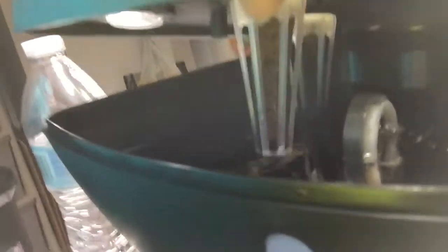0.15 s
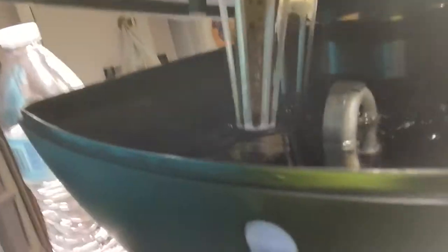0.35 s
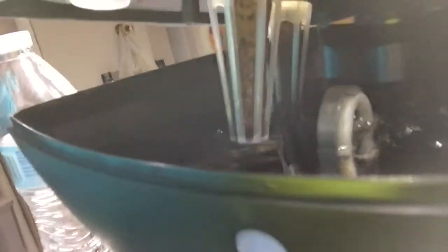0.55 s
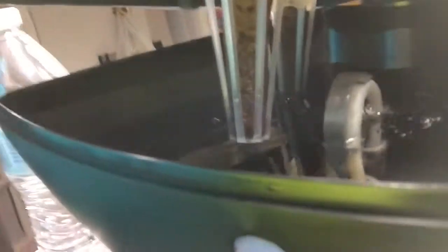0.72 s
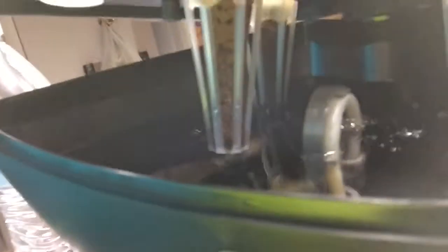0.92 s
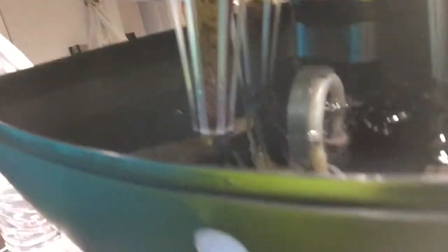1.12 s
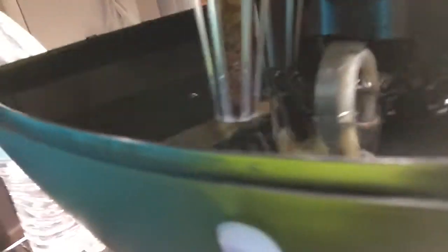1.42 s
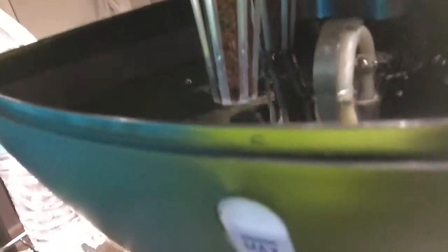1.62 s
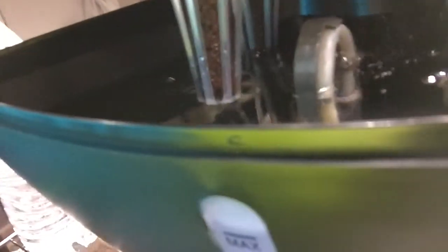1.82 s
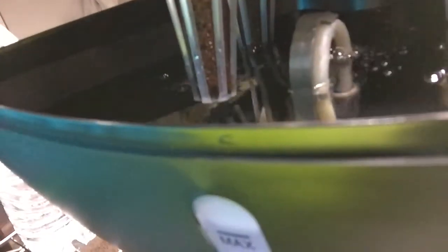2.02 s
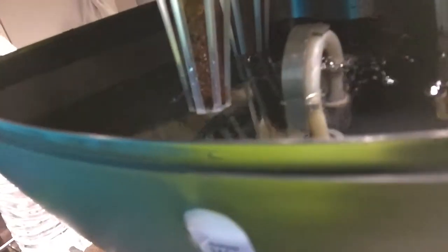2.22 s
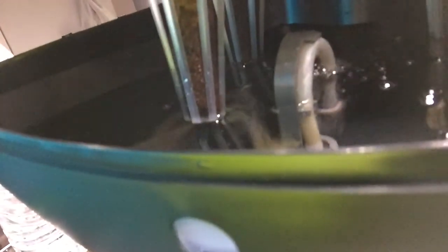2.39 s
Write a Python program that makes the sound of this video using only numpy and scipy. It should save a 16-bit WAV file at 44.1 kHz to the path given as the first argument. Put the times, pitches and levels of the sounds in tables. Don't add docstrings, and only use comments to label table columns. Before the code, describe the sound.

Water bubbling in a small plastic reservoir indoors: a quiet, low, unsteady pump drone with muffled glugs runs throughout, under thin froth and tiny high pops. At about 0.2 s a plastic lid snaps loudly, bouncing at 0.27, 0.31 and 0.37 s, its short room tail cut off by about 0.45 s. Then scattered crisp pops, brighter ones near 0.57 and 1.6 s, continue until 2.5 s. Close phone microphone, noise-suppressed.

```python
import sys
import numpy as np
from scipy import signal
from scipy.fft import rfft, irfft, next_fast_len
from scipy.io import wavfile
from scipy.ndimage import uniform_filter1d, map_coordinates

SR = 44100
rng = np.random.default_rng(int(sys.argv[2]) if len(sys.argv) > 2 else 0)


def to_wav(s):
    ch = np.atleast_2d(s).T
    pcm = np.round(np.clip(ch, -1, 1) * 32767)
    wavfile.write(sys.argv[1], SR, pcm.astype(np.int16))


def nominal_scale(level):
    x = np.asarray(level, float) / 20
    return 10 ** x


N = 112454

# freq_hz, density_db_per_hz
DRONE_SPECTRUM = [(24, -56.5), (50, -34), (140, -3.5), (172, -8.5), (207, -7), (483, -8), (600, -19),
                  (1290, -20.5), (1750, -32), (2300, -46), (5000, -120)]
# freq_hz, width_hz, lift_db over the drone
TUB_MODES = [(70.4, 8, 9), (108, 5, 8.5), (145.8, 2.5, 12.5), (162.5, 6, 4), (217, 47, 9), (273, 6, -2.5),
             (582, 5.5, -0.5), (627, 18, 11.5)]
# freq_hz, level_db rms
PUMP_TONES = [(479.5, -54), (539, -59)]
# time_s, level_db rms
HUM_SWELL = [(0.501, -42.5), (0.849, -61), (1.021, -50), (1.25, -51), (1.47, -46.5), (1.76, -39.5),
             (2.05, -52), (2.251, -64), (2.37, -38), (2.461, -58.5), (2.55, -33.5)]
# time_s, level_db
FROTH_LEVEL = [(0.0, -64.5), (0.25, -68), (0.42, -73), (0.62, -82.5), (0.74, -72.5), (0.821, -66),
               (0.95, -68), (1.05, -105), (1.321, -75), (1.52, -69), (1.9, -85), (2.14, -86), (2.27, -88),
               (2.55, -97)]
# freq_hz, density_db_per_hz
SPRAY_SPECTRUM = [(5000, -40.5), (6500, -5.5), (7500, -3), (11500, 0.5), (12600, -9.5), (16000, -28)]
# start_s, peak_db, pitch_hz
POPS = [(0.068, -49, 5900), (0.17, -59, 8300), (0.193, -50, 6000), (.4424, -60, 7500), (0.5745, -42, 11200),
        (0.6331, -58, 6230), (0.643, -54, 6500), (.659, -57, 7940), (.728, -54, 7180), (.7444, -58, 11600),
        (0.8035, -53.5, 7080), (0.853, -54, 10960), (0.912, -50, 11100), (1.012, -52, 6970),
        (1.52, -55, 7700), (1.5288, -46.5, 7510), (1.6017, -36.5, 4830), (1.6443, -55, 7500),
        (1.694, -52.5, 7300), (1.705, -53, 8970), (1.716, -57, 9000), (1.7846, -50, 8280),
        (1.91, -53, 7260), (2.036, -44.5, 6100), (2.098, -57, 6230), (2.19, -58.5, 10740),
        (2.324, -48.5, 7370)]
# start_s, peak_db, pitch_hz
MORE_POPS = [(0.639, -64, 14300), (.8, -66, 14350), (.915, -63, 14600), (1.281, -53, 10160),
             (1.332, -58.5, 10050), (1.385, -61.5, 9700), (1.59, -55, 13550), (1.64, -57.5, 10640),
             (1.71, -50.5, 11500), (1.775, -57, 14450), (1.865, -67, 7800), (1.946, -62, 10660),
             (2.055, -57, 10140), (2.04, -48, 7450), (2.305, -57, 7510), (.892, -58.5, 7300)]
# start_s, peak_db, pitch_hz
RINGING_BUBBLES = [(.07, -58, 2053), (.575, -76.5, 3050), (.68, -74, 2140), (.77, -74, 3090),
                   (0.791, -64, 1920), (.82, -77, 3080), (1.278, -68.5, 3940), (1.33, -82, 2850),
                   (1.375, -69.5, 3440), (1.419, -85, 2850), (1.444, -79, 4380), (1.486, -75, 3370),
                   (1.509, -73, 3440), (1.515, -77, 2730), (1.68, -73.5, 3920), (1.82, -81, 3660),
                   (1.87, -81, 2790), (1.99, -84, 3290), (2.02, -71, 2780), (2.119, -80, 3380),
                   (2.26, -70.5, 4920), (2.449, -79, 3400), (2.509, -67, 4980), (2.508, -65, 7450),
                   (1.976, -72, 9050)]
# centre_s, length_s, centre_hz, width_hz, level_db
CLUSTERS = [(0.073, 0.05, 5680, 900, -52.5), (0.164, 0.042, 7950, 1800, -65),
            (0.377, 0.016, 9400, 4000, -66), (0.407, 0.033, 11000, 3000, -74),
            (0.453, 0.015, 8000, 2500, -69), (0.601, 0.064, 8960, 1200, -70),
            (.635, .025, 14500, 2500, -75.5), (0.692, 0.02, 7600, 2500, -66),
            (.72, 0.078, 10800, 2200, -72), (0.718, .07, 14300, 900, -79), (0.778, .012, 10500, 3500, -66),
            (0.794, 0.01, 11100, 2500, -79), (0.836, 0.019, 9500, 4000, -65), (.85, 0.018, 8300, 1200, -61),
            (0.921, 0.035, 8800, 1400, -63.5), (1.108, 0.029, 6880, 900, -67),
            (1.29, 0.014, 7630, 3500, -72), (1.383, 0.096, 6850, 2500, -76.5),
            (1.606, 0.044, 7310, 1200, -74), (1.646, 0.012, 8800, 2500, -66),
            (1.788, 0.043, 8150, 2500, -59), (1.877, 0.024, 7430, 1200, -69),
            (1.985, 0.041, 10430, 2400, -64), (2.02, .03, 6000, 1000, -70), (2.07, .03, 7500, 1000, -66),
            (2.065, .04, 13800, 1800, -77), (2.103, 0.023, 7500, 900, -62.5),
            (2.125, .025, 10800, 2000, -70), (2.144, .025, 7700, 1000, -66),
            (2.215, 0.058, 10700, 2400, -70), (2.22, 0.017, 13200, 2000, -70),
            (2.325, 0.054, 9870, 3500, -68.5), (2.362, 0.018, 7800, 1400, -63),
            (2.405, 0.023, 6450, 700, -63), (2.475, 0.1, 10300, 1700, -77), (2.52, .025, 8500, 500, -69.5),
            (1.45, 0.3, 3080, 1000, -81)]
# start_s, peak_db, centre_hz, spread_octaves
LID_CONTACTS = [(0.209, -27, 1000, 0.5), (.2150, -13.5, 1100, 0.35), (0.2178, -15.5, 1200, .4),
                (.2175, -26.5, 4500, .8), (0.2215, -9.5, 2100, .4), (.2238, -14.5, 1150, 0.4),
                (0.2262, -13.5, 6300, 0.53), (.2266, -19.5, 11200, 1.2), (0.2240, -13.5, 327.4, 0.66),
                (0.2684, -14, 1280, 0.24), (.2690, -27, 3140, 0.46), (0.2715, -20, 445, 0.76),
                (0.2915, -36.5, 2400, 0.5), (0.3108, -18.5, 2180, 0.25), (0.313, -15.5, 790, 1.23),
                (0.3664, -25, 2060, 0.38), (0.367, -22.5, 750, 1)]
# freq_hz, t60_s
LID_MODES = [(215, 0.055), (290, 0.036), (420, 0.021), (600, 0.027), (680, 0.032), (955, 0.029),
             (1090, 0.023), (1280, 0.018), (1620, 0.015), (1950, 0.015), (2350, .008), (2900, 0.011),
             (3700, 0.0049), (6500, 0.0024)]
# freq_hz, t60_s
ROOM_T60 = [(200, .5), (400, 0.79), (1000, 0.82), (3000, 0.27), (8000, 0.26), (15000, .35)]
# freq_hz, level_db
ROOM_COLOUR = [(150, -6.5), (300, 6), (1000, -9.5), (3000, -2), (5500, 5), (7000, -3), (10000, 4),
               (15000, 4.5)]
# freq_hz, close_s
SUPPRESSOR_CLOSE = [(1500, 0.423), (2200, .47), (3800, 0.468), (5500, 0.35), (11000, 0.46), (16000, .345)]
# freq_hz, level_db rms per 500 Hz
HISS_SPECTRUM = [(1500, -92.5), (2500, -101), (4500, -103), (7000, -99), (11500, -99), (12800, -112),
                 (16000, -118)]


def unit(x):
    return x / np.sqrt(np.mean(x ** 2) + 1e-20)


def along(points, hz):
    f, v = np.transpose(points)
    return np.interp(np.log(hz + 1), np.log(f + 1), v)


def filtered(x, response):
    m = next_fast_len(N + SR // 2)
    return irfft(rfft(x, m) * response(np.fft.rfftfreq(m, 1 / SR)), m)[:N]


def wobble(rate_hz):
    knots = rng.standard_normal(int(N / SR * 60) + 4)
    return map_coordinates(knots, [np.arange(N) * min(rate_hz, 60) / SR])


def bell(x, width):
    return np.exp(-.5 * (x / width) ** 2)


def box(x, span):
    return np.exp(-(2 * x / span) ** 4)


def bubbles(start_s, hz, gain, cycles, rise, size):
    t = np.arange(size) / SR
    u = t * hz[:, None] / cycles
    phase = 2 * np.pi * hz[:, None] * t * (1 + rise * np.minimum(u, 2))
    envelope = 2.0 * np.exp(-3 * u) * (1 - np.exp(-4 * u)) ** 2
    wave = gain[:, None] * np.sin(phase) * envelope
    at = (start_s * SR).astype(int)[:, None] + np.arange(size)
    return np.bincount(at.ravel(), wave.ravel(), N + SR)[:N]


def swarm(rate_hz, centre_hz, spread, cycles, scatter_db, size):
    when, pitch, loud = rng.random((600, 3))[:int(rate_hz * N / SR)].T
    hz = centre_hz * np.exp(spread * np.log(pitch / (1 - pitch)) / 1.3)
    gain = nominal_scale(-scatter_db * np.log(loud))
    return unit(bubbles(when * N / SR, np.clip(hz, 60, 15500), gain, cycles, rise=.002, size=size))


def streaked(x):
    z = signal.stft(x, nperseg=1024, noverlap=768)[2]
    field = unit(uniform_filter1d(rng.standard_normal(z.shape), size=11, axis=1))
    return signal.istft(z * nominal_scale(9 * field - 7), nperseg=1024, noverlap=768)[1][:N]


def drone():
    edge_hz, edge_db = 1800, -14

    def response(f):
        tub = np.sqrt(1 + sum(nominal_scale(db) ** 2 / (1 + (2 * (f - c) / w) ** 2) for c, w, db in TUB_MODES))
        dark = nominal_scale(edge_db / (1 + (edge_hz / np.maximum(f, 20)) ** 40))
        return nominal_scale(along(DRONE_SPECTRUM, f)) * tub * dark

    noise = unit(filtered(rng.standard_normal(N), response))
    return noise * nominal_scale(0.16 * wobble(1.5) + 0.57 * wobble(30))


def glugs():
    large = swarm(90, 248, 0.52, cycles=3, scatter_db=5.5, size=2000)
    return filtered(large, lambda f: 1 / (1 + (f / 1100) ** 6) / (1 + (90 / (f + 1)) ** 4))


def pump_tones():
    t = np.arange(N) / SR
    drift_rad, hum_hz = .3, 137.2
    tones = np.zeros(N)
    for hz, db in PUMP_TONES:
        level = nominal_scale(db + 0.5 + 0.83 * wobble(5.5))
        tones += level * np.sin(2 * np.pi * hz * t + drift_rad * wobble(5))
    when_s, db = np.transpose(HUM_SWELL)
    hum = np.sin(2 * np.pi * hum_hz * t + drift_rad * wobble(3.6))
    return tones + nominal_scale(np.interp(t, when_s, db) - 0.5) * hum


def pump():
    return nominal_scale(-43.5) * (drone() + nominal_scale(-17) * glugs()) + pump_tones()


def froth():
    f, _, z = signal.stft(rng.standard_normal(N), SR, nperseg=256)
    patches = uniform_filter1d(rng.standard_normal(z.shape), size=16, axis=0)
    patches = unit(uniform_filter1d(patches, size=3, axis=1))
    tone = nominal_scale(along(SPRAY_SPECTRUM, f))[:, None]
    spray = signal.istft(z * tone * nominal_scale(6.2 * patches), SR, nperseg=256)[1][:N]
    small = swarm(40, 9200, .11, cycles=40, scatter_db=3.5, size=700)
    when_s, db = np.transpose(FROTH_LEVEL)
    level = nominal_scale(np.interp(np.arange(N) / SR, when_s, db) - 9)
    return level * (small + nominal_scale(-5.5) * unit(spray))


def thin_tones():
    return nominal_scale(-94) * swarm(110, 5680, 0.17, cycles=230, scatter_db=0, size=4000)


def pops():
    start_s, db, hz = np.transpose(POPS + MORE_POPS)
    direct = bubbles(start_s - .001, hz, nominal_scale(db + 3.5), cycles=25, rise=0.013, size=900)
    slap = bubbles(start_s + 0.027, hz, nominal_scale(db - 15), cycles=25, rise=0, size=900)
    return direct + slap


def ringing_bubbles():
    ring_s = 0.026
    start_s, db, hz = np.transpose(RINGING_BUBBLES)
    rings = bubbles(start_s, hz, nominal_scale(db + 5.5), ring_s * hz[:, None], 0.004, size=3000)
    return rings * nominal_scale(4 * wobble(60))


def pop_halo():
    f, t, z = signal.stft(rng.standard_normal(N), SR, nperseg=256)
    f = f[:, None]
    start_s, db, hz = np.transpose(POPS + MORE_POPS)
    start_s = start_s[:, None]
    narrow = (bell(f - hz, 0.044 * hz) * nominal_scale(db - 11)) @ bell(t - start_s - .004, .013)
    broad = nominal_scale(along(SPRAY_SPECTRUM, f)) * (nominal_scale(.5 * db - 49) @ bell(t - start_s, .012))

    centre_s, length_s, hz, width_hz, db = np.transpose(CLUSTERS)
    clusters = (box(f - hz, width_hz) * nominal_scale(db)) @ box(t - centre_s[:, None], length_s[:, None])
    flecks = nominal_scale(7.5 * unit(uniform_filter1d(rng.standard_normal(z.shape), size=14, axis=0)))
    return signal.istft(z * (narrow + broad + flecks * clusters), SR, nperseg=256)[1][:N]


def surface():
    return streaked(froth() + pop_halo()) + thin_tones() + pops() + ringing_bubbles()


def lid_crack(centre_hz, t):
    t60_s, rise_s = 0.014, .0007
    burst = nominal_scale(-60 * t / t60_s) * (1 - np.exp(-t / rise_s)) * rng.standard_normal(len(t))

    def band(f):
        return (f / (f + centre_hz)) ** 2 / (1 + (f / centre_hz / 1.7) ** 10)

    grit = filtered(np.pad(burst, (100, 0)), band)[100:][:len(t)]
    grit = grit * (1 - np.exp(-(t * centre_hz) ** 2))
    return grit / abs(grit).max()


def lid():
    out, t = np.zeros(N + SR), np.arange(SR // 5) / SR
    lag_s = 0.0013
    hz, t60_s = np.transpose(LID_MODES)[:, :, None]
    late = np.maximum(t - lag_s * np.sqrt(1000 / hz), 0)
    modes = nominal_scale(-60 * late / t60_s) * np.sin(2 * np.pi * hz * late) * (1 - np.exp(-late * hz)) ** 2
    for start_s, db, centre_hz, spread in LID_CONTACTS:
        share = bell(np.log2(hz / centre_hz), spread) * nominal_scale(rng.normal(0, 2.4, hz.shape))
        ring = (share * modes).sum(0)
        delay_s = lag_s * np.sqrt(1000 / centre_hz)
        crack = np.roll(lid_crack(centre_hz, t), round(delay_s * SR))
        hit = ring / abs(ring).max() + nominal_scale(-9) * crack
        out[round((start_s - delay_s) * SR):][:len(t)] += nominal_scale(db) * hit
    return out[:N]


def room(x):
    hz, t, z = signal.stft(rng.standard_normal(SR // 2), SR, nperseg=256)
    hz = hz[:, None]
    decay_db = along(ROOM_COLOUR, hz) - 60 * t / along(ROOM_T60, hz)
    tail = signal.istft(z * nominal_scale(decay_db), SR, nperseg=256)[1]
    wet = signal.fftconvolve(np.pad(x, (250, 0)), tail / 40)[:N]

    hz, t, z = signal.stft(wet, SR, nperseg=512)
    shut_s, shut_db = .022, -18
    shut = (1 + np.tanh((t - along(SUPPRESSOR_CLOSE, hz)[:, None]) / shut_s)) / 2
    return signal.istft(z * nominal_scale(shut_db * shut), SR, nperseg=512)[1][:N]


def scene():
    mic_hz = 104
    near = filtered(lid(), lambda f: (1j * f / (mic_hz + 1j * f)) ** 2)
    return (pump() + surface() + near + nominal_scale(-11) * room(near))[None]


def top_cut(x):
    return signal.sosfilt(signal.butter(12, 16040, fs=SR, output="sos"), x)


def record(dry):
    noise = rng.standard_normal(N) + 0.97 * streaked(rng.standard_normal(N))
    hiss = filtered(noise, lambda f: nominal_scale(along(HISS_SPECTRUM, f)) * np.sqrt(SR / 1000) * (f > 1500))
    fade = np.minimum(np.arange(N, 0, -1) / (.006 * SR), 1)
    mix = (dry[0] + hiss) * fade
    return top_cut(mix[None])


dry = scene()
out = record(dry)
to_wav(out)
```